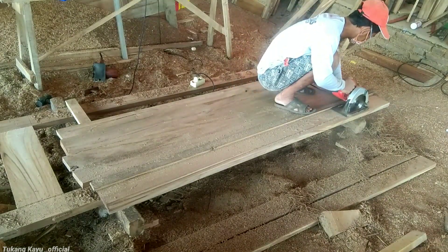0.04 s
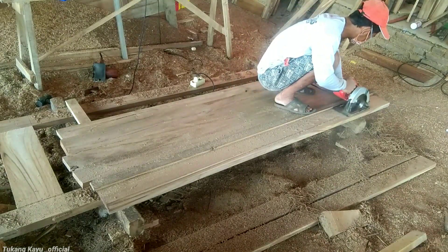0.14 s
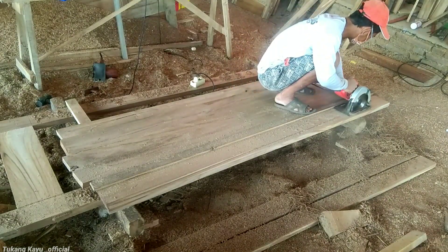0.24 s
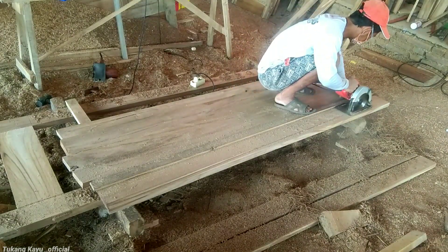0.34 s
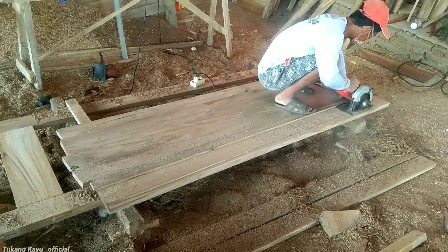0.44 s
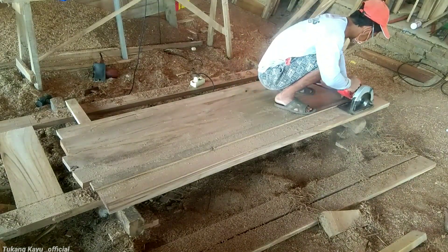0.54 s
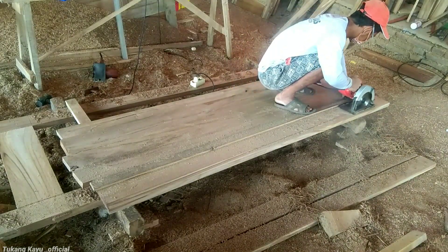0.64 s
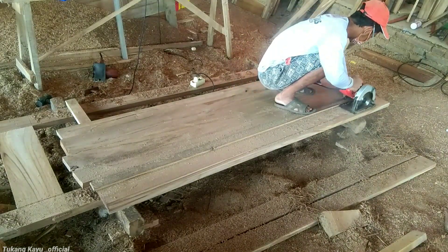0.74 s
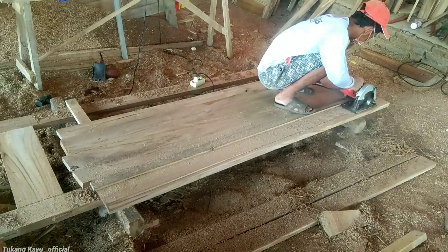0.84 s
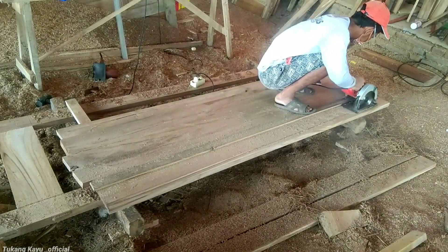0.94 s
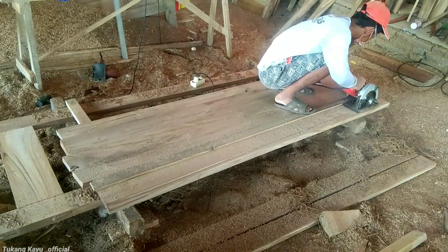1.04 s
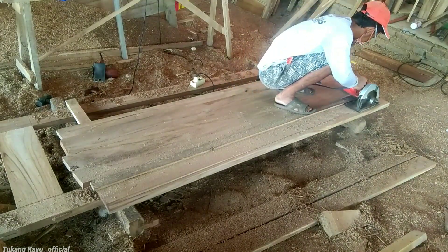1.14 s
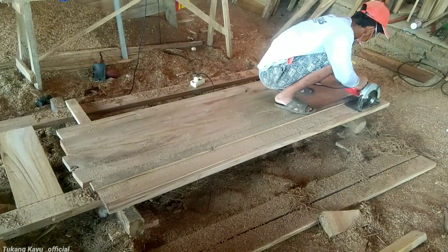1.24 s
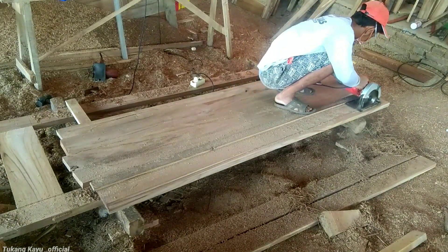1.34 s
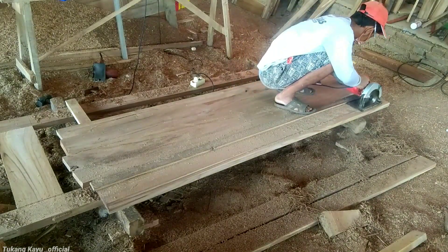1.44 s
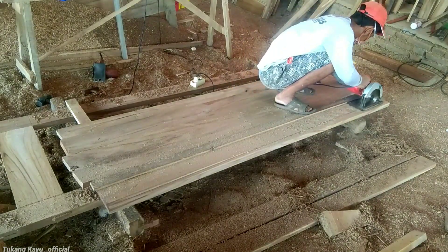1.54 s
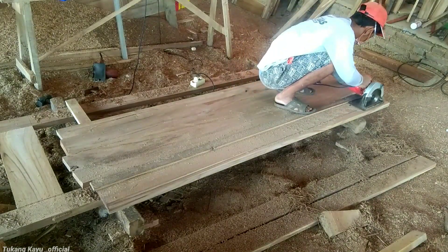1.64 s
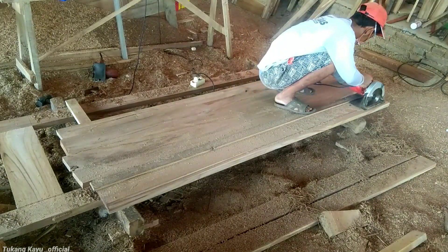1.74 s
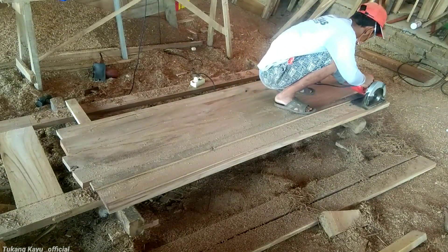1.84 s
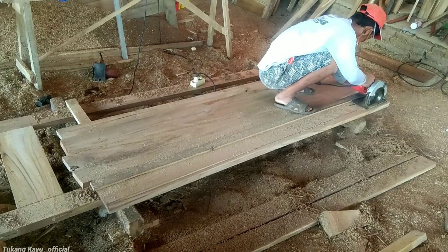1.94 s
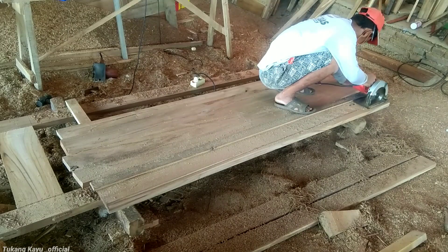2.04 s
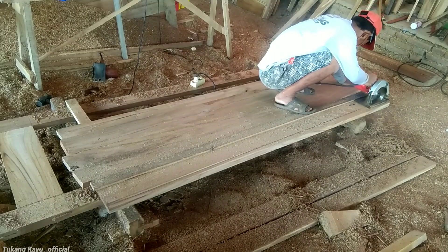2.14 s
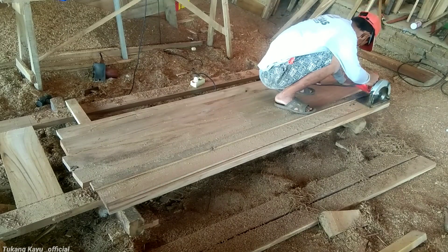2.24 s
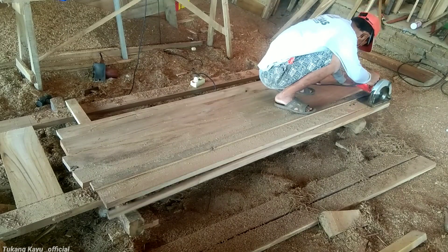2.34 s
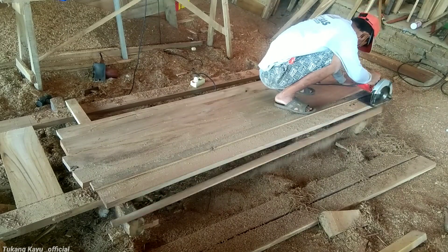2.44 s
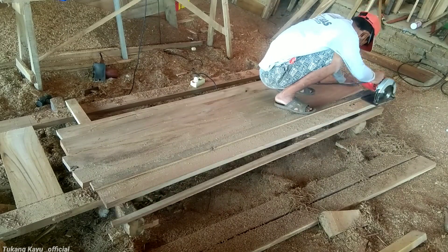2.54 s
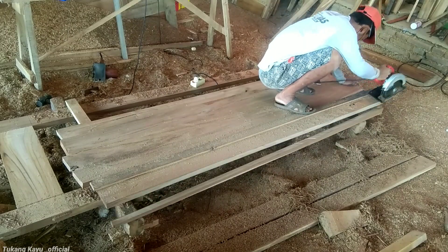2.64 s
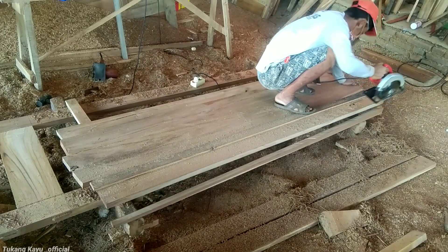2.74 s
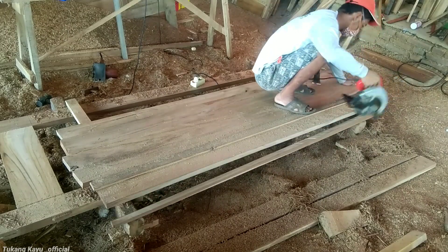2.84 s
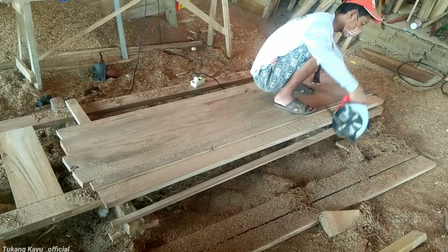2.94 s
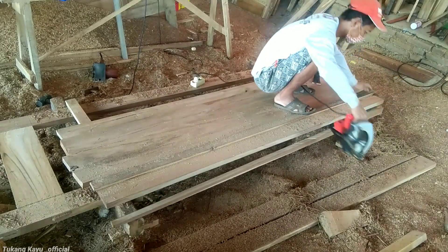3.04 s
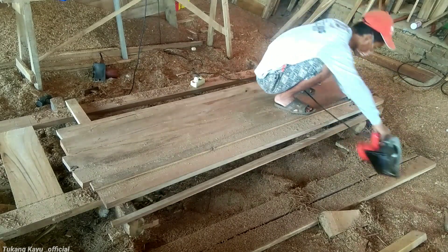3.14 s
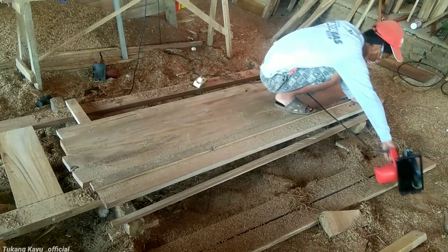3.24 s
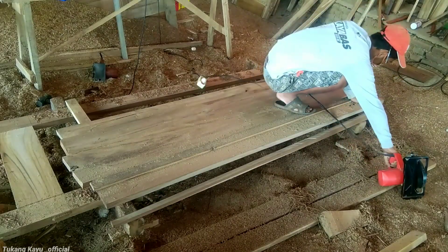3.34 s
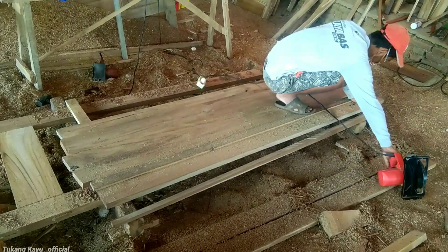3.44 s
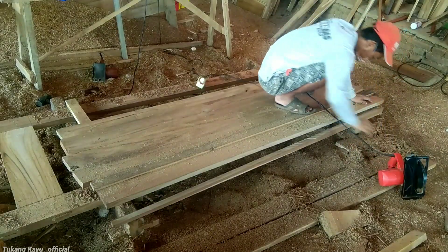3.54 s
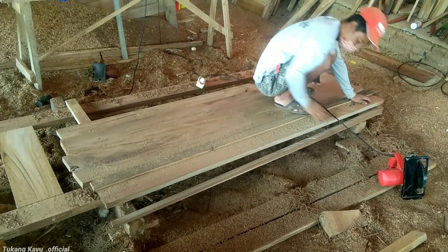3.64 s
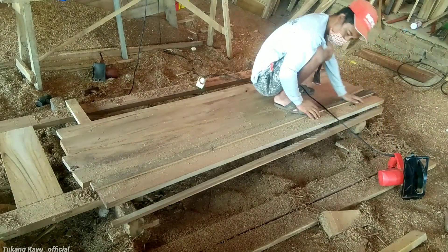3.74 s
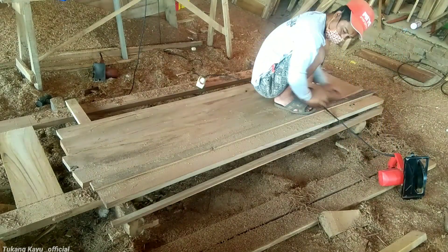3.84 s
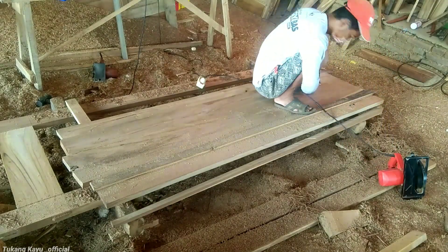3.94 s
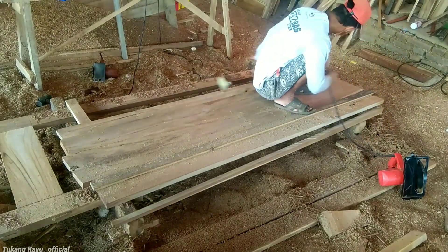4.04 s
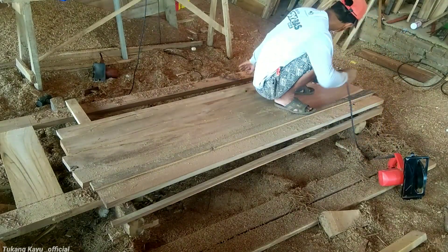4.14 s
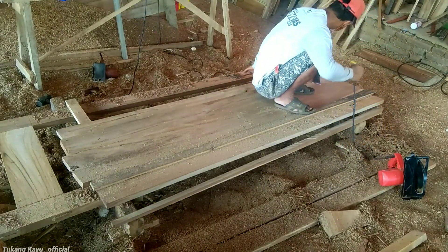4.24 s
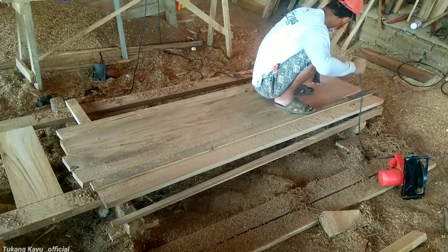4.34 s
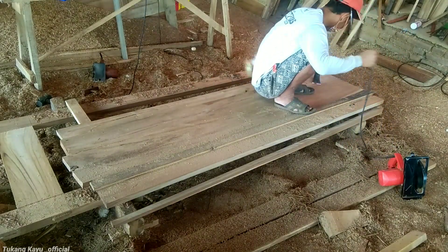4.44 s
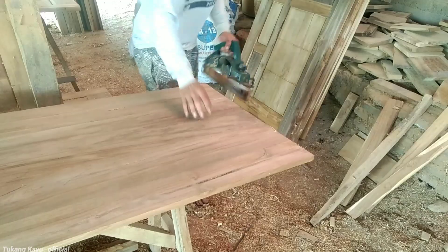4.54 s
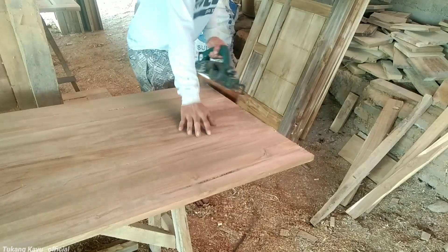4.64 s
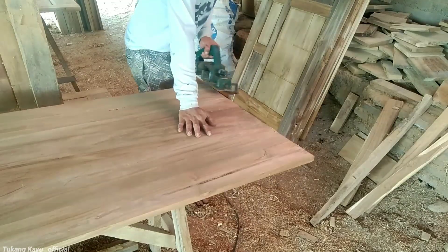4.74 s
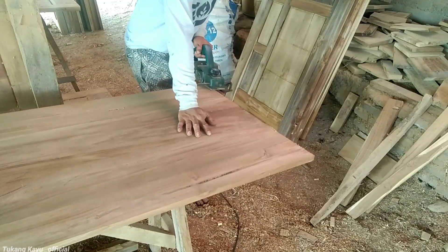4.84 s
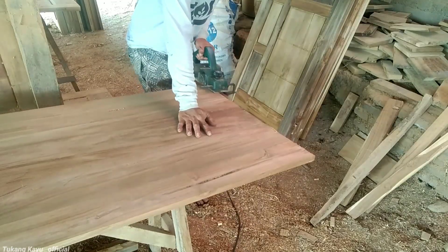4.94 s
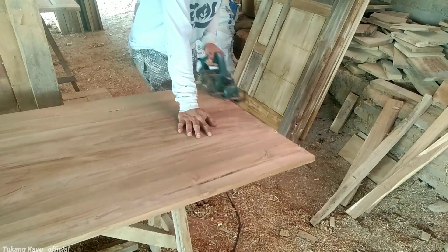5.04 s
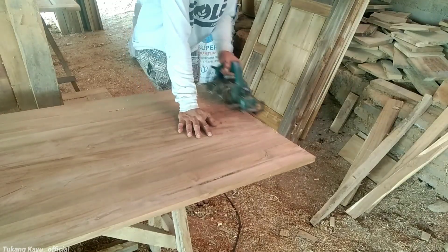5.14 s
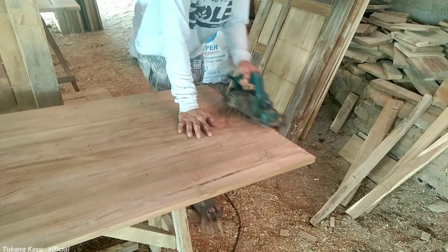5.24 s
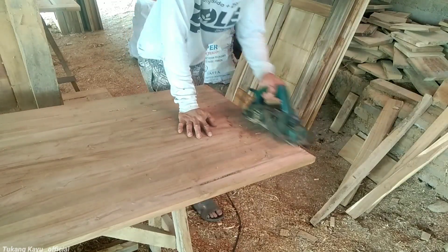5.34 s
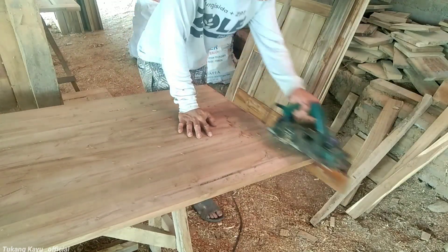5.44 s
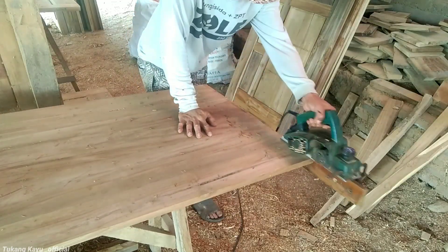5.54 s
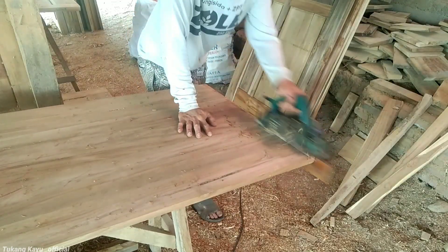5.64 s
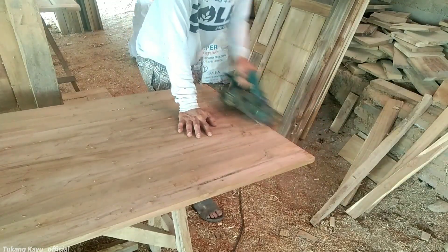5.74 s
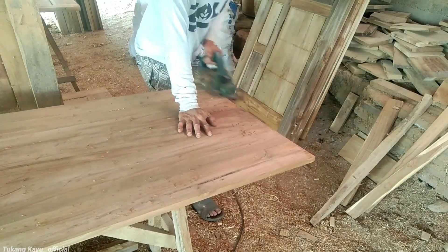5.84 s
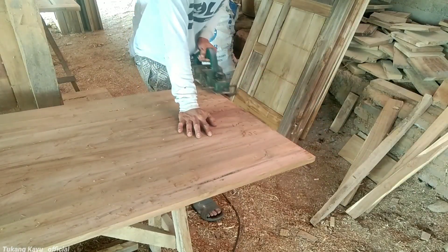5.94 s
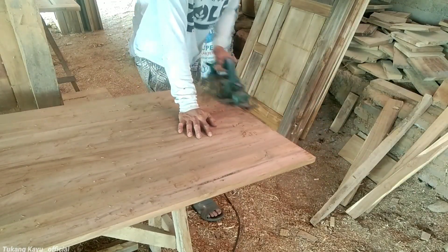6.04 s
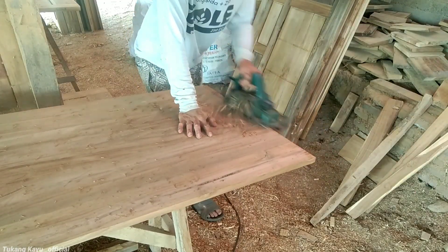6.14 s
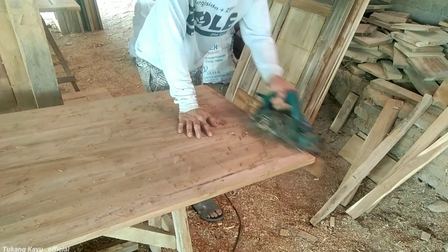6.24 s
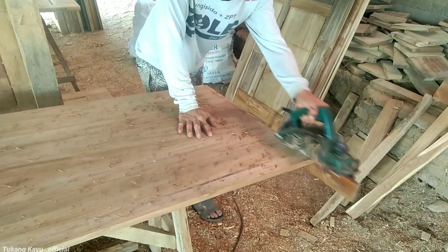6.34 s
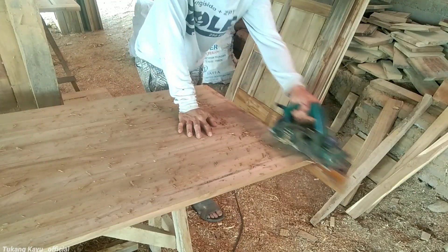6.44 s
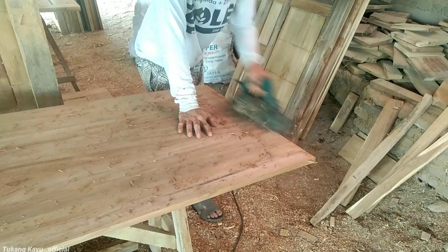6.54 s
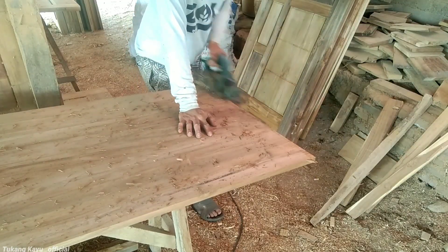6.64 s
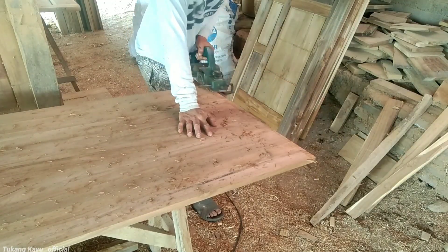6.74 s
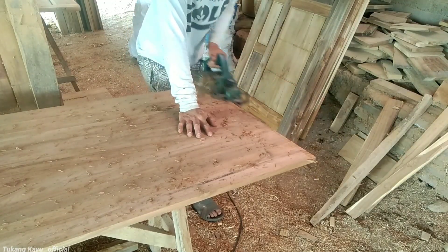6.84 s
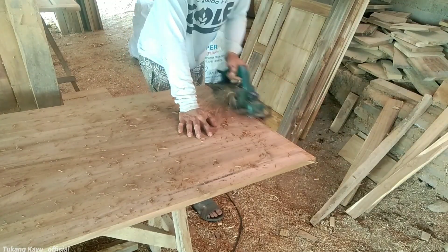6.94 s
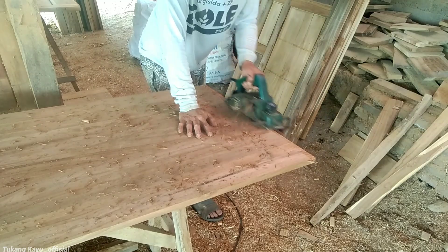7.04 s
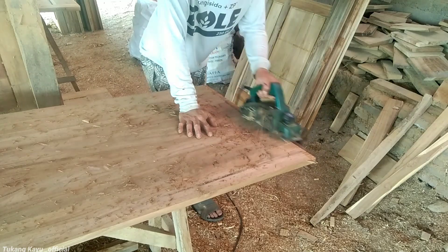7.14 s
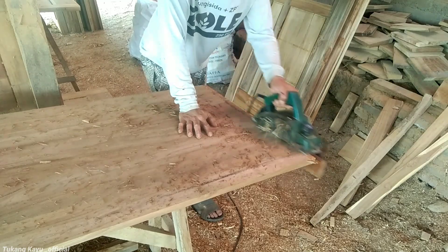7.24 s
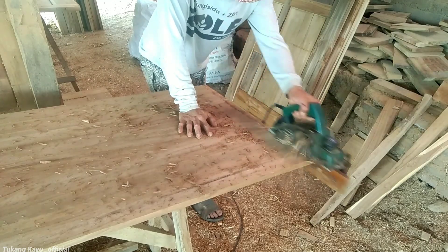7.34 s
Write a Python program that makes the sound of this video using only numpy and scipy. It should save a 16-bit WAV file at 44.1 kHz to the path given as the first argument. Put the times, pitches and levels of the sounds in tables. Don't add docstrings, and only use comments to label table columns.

```python
import sys
import numpy as np
from scipy import signal
from scipy.fft import rfft, irfft
from scipy.io import wavfile
from scipy.ndimage import uniform_filter1d

SR = 44100
rng = np.random.default_rng(int(sys.argv[2]) if len(sys.argv) > 2 else 0)


def linear_from_db(decibels):
    return 10 ** (np.asarray(decibels, float) / 20)


def wav_out(sig):
    wavfile.write(sys.argv[1], SR, np.round(np.clip(np.atleast_2d(sig).T, -1, 1) * 32767).astype(np.int16))


N = 326340
T = np.arange(N) / SR
LAND_S = 6.868
FREE_FROM_S = 5.0


def curves(table, fade=0.004):
    s, *columns = np.transpose(table)
    gate = np.interp(T, [s[0] - fade, s[0], s[-1], s[-1] + fade], [0, 1, 1, 0])
    return [np.interp(T, s, c) for c in columns] + [gate]


def hold(start, length, edge):
    return np.clip(np.minimum(T - start + edge, start + length + edge - T) / edge, 0, 1)


def ramp(start, length):
    return np.clip((T - start) / length, 0, 1)


def unit(x):
    return x / np.sqrt(np.mean(x ** 2))


def at(points, hz):
    f, db = np.transpose(points)
    return np.interp(np.log(hz + 1), np.log(f), db, left=-90, right=-90)


def walk(rate):
    k = int(SR / rate)
    steps = np.repeat(rng.standard_normal(N // k + 1), k)
    return 2.43 * uniform_filter1d(uniform_filter1d(steps, k), k)[:N]


def jumps(rate, soft):
    which = np.cumsum(rng.random(N) < rate / SR)
    return uniform_filter1d(rng.standard_normal(N // 100)[which], int(soft * SR))


def hiss(points, patchy_db, rate):
    hz = np.arange(N // 2 + 1) * SR / N
    spec = rfft(rng.standard_normal(N)) * linear_from_db(at(points, hz))
    place = 2 * np.log2(hz + 1)
    first, last = int(2 * np.log2(points[0][0])), int(2 * np.log2(points[-1][0])) + 1
    total = np.zeros(N)
    for b in range(first, last + 1):
        band = irfft(spec * np.clip(1 - abs(place - b), 0, 1), N)
        total += band * linear_from_db(patchy_db * walk(rate))
    return unit(total)


def ring(x, hz, width):
    return signal.lfilter(*signal.iirpeak(hz, hz / width, SR), x)


def tone(turns, hz, order, db, wobble=0.):
    audible = order * hz < 16500
    return np.sqrt(2) * linear_from_db(db) * audible * np.sin(2 * np.pi * order * turns + wobble)


def song(order):
    # start_s, length_s, loudest blade order, level_db
    songs = [(0.02, 0.34, 24, -50), (0.64, 0.15, 24.2, -48), (0.83, 0.1, 23.5, -38.5),
             (1.025, 0.3, 23.5, -40), (1.474, 0.09, 23.8, -48), (1.562, 0.11, 24, -39),
             (1.75, 0.087, 24.5, -36), (1.85, .04, 23.4, -41), (1.91, 0.045, 24.5, -39),
             (1.963, 0.031, 23.6, -46), (2.07, 0.042, 23, -46.5), (2.132, 0.12, 24, -37)]
    total = linear_from_db(-54)
    for s, d, k, db in songs:
        total = total + hold(s, d, edge=.025) * linear_from_db(db - 9 * (order - k) ** 2)
    return 20 * np.log10(total)


def howls(turns, hz):
    # start_s, length_s, first_hz, last_hz, level_db
    kerf = [
        (1.4, .35, 7850, 8050, -43),
        (2.255, .085, 6950, 6750, -39),
        (2.435, .045, 9900, 11500, -43),
    ]
    path = []
    for s, d, first_hz, last_hz, _ in kerf:
        path += [(s, first_hz), (s + d, last_hz)]
    centre_hz = np.interp(T, *np.transpose(path))
    howling = sum(hold(s, d, edge=.03) * linear_from_db(db) for s, d, _, _, db in kerf)
    howl = 0
    for k in range(36, 72):
        off_db = -6 * ((k * hz - centre_hz) / 180) ** 2
        howl = howl + tone(turns, hz, k, off_db, 0.77 * walk(40))
    return howling * howl


def saw():
    # time_s, turns_hz
    saw_speed = [(0.1, 173.8), (.72, 176.5), (.92, 173.5), (1.18, 175.3), (1.38, 174.5), (1.44, 178.5),
                 (1.53, 180.4), (1.59, 178.8), (1.72, 178.5), (1.74, 174.5), (1.77, 172.8), (1.82, 173.8),
                 (1.88, 171.8), (1.91, 173.3), (2.03, 169.5), (2.12, 168.3), (2.25, 161.5), (2.64, 172.4)]
    # time_s, level_db
    cutting = [
        (0.0, -27.5),
        (0.03, -27.5),
        (1.32, -28),
        (1.49, -31.5),
        (1.58, -28),
        (2.22, -27),
        (2.61, -30.5),
        (2.67, -41),
    ]
    # pitch_hz, density_db (per Hz)
    chip_colour = [(530, -48), (900, -25.5), (1790, -12), (3400, -11.5), (4150, -0.5), (4700, -9),
                   (6300, -10.5), (8500, -2.5), (10400, -4), (13000, -1.5), (16000, -0.5)]
    # pitch_hz, level_db
    damped_modes = [(3780, -10), (4790, -14), (5100, -8), (5570, -9), (6600, -11), (7400, -7), (8750, -1),
                    (10250, 3), (10520, 4), (11480, -4), (11950, -1), (12600, -8), (13600, -2), (14850, -3)]
    hz, _ = curves(saw_speed)
    hiss_db, gate = curves(cutting)
    turns = np.cumsum(hz) / SR
    runout = 1 + 0.034 * np.cos(2 * np.pi * turns)
    through = 0.89 * ramp(2.28, 0.073)
    chips = runout * hiss(chip_colour, patchy_db=.8, rate=20)
    chips = chips - through * ring(chips, 3460, 710)
    modes = 0
    for f, db in damped_modes:
        modes = modes + linear_from_db(db + 1.4 * walk(12)) * unit(ring(rng.standard_normal(N), f, f / 160))
    teeth = 0
    for k in range(22, 26):
        teeth = teeth + tone(turns, hz, k, song(k) + 1.4 * walk(25), .35 * walk(40))
    teeth = (1 - through) * teeth
    torn = hiss([(2000, -18), (3200, 3.0), (5600, 4.0), (6500, -1), (8000, -20)], patchy_db=1.5, rate=30)
    rasp = hold(2.43, 0.064, edge=0.037) * linear_from_db(-34) * torn
    chirp = hold(2.59, 0.017, edge=0.0065) * tone(T, 1, 4800, -33.5)
    cut = linear_from_db(hiss_db) * linear_from_db(-3) * (chips + runout * unit(modes))
    return rasp + chirp + gate * (cut + teeth) + howls(turns, hz)


def yard():
    # time_s, drone_hz, drone_db, second_db
    engine_drone = [
        (2.88, 170, -74, -89),
        (3.07, 157.7, -66, -73),
        (3.218, 173, -61, -75),
        (4.172, 162.2, -65.5, -71),
        (4.55, 177, -72, -82),
    ]
    # start_s, end_s, pitch_hz, level_db
    engine_throbs = [
        (0.12, 0.456, 428, -62),
        (2.829, 2.981, 204, -64),
        (3.688, 3.919, 211, -55),
        (4.042, 4.24, 205, -55.5),
    ]
    # time_s, level_db
    low_air = [(0.0, -57.5), (0.15, -55), (0.6, -59), (1.16, -63), (1.35, -58), (1.45, -80.5), (2.47, -57),
               (2.89, -103), (3.14, -69.5), (4.01, -86), (4.42, -99), (4.7, -86)]
    # pitch_hz, density_db (per Hz)
    low_colour = [(24, -50), (40, -37), (161, -14), (301, -11), (413, -5.5), (604, -7.5), (830, -3),
                  (1230, -7.5), (1500, -14), (1950, -48), (3300, -120)]
    hz, drone_db, second_db, gate = curves(engine_drone, fade=0.042)
    turns = np.cumsum(hz) / SR
    engine = tone(turns, hz, 1.0, drone_db + 2 * walk(23.08), 0.69 * walk(18))
    engine = engine + tone(turns, hz, 1.6, second_db, 1.0 * walk(2.2))
    rumble = linear_from_db(-63.5) * hiss([(40, -16), (120, -3), (350, 2), (600, -21)], patchy_db=1.5, rate=8)
    throbs = 0
    for a, b, f, db in engine_throbs:
        heard = np.interp(T, [a, a + 0.035, b - .04, b], [0, 1, 1, 0])
        throbs = throbs + heard * tone(T, 1, f, db + walk(30))
    lows_db, open_ = curves(low_air)
    lows = open_ * linear_from_db(lows_db) * hiss(low_colour, patchy_db=2.4, rate=12)
    return gate * (engine + rumble) + throbs + lows


def knocks():
    # start_s, peak_db, pitch_hz, crack_db, decay_s
    blows = [(0.101, -43, 428, -13, 0.17), (0.685, -19, 1350, -7.5, 0.2), (0.955, -20.5, 1560, -7.5, 0.3),
             (1.187, -23, 1100, -10, 0.24), (1.375, -58, 400, -35, .15), (1.539, -37.5, 600, -29, 0.2),
             (1.766, -49, 650, -30, 0.17), (1.875, -55, 400, -34, 0.11), (2.018, -20, 1080, -8, 0.23),
             (2.249, -55, 400, -42, .12), (2.371, -23, 2020, -9, 0.24), (2.412, -39, 374, -3, 0.84),
             (2.569, -23, 807, -12, 0.24), (2.9872, -17.5, 675, -38, 0.2), (3.063, -23.5, 466, -32, 0.16),
             (3.081, -15, 990, -28, 0.1), (3.1, -23.5, 393, -28, 0.19), (3.358, -25, 466, -17, 0.34),
             (3.852, -36, 510, -23, 0.43), (3.937, -35, 1010, -11.5, 0.97), (4.013, -24.5, 2100, -4, 0.26),
             (4.128, -44, 1340, -6.5, 0.25), (4.176, -50, 2330, -9, 0.23), (4.193, -44, 1800, -4, 0.23),
             (4.407, -50, 404, -40, 0.07), (4.507, -64.5, 308, 1.5, 0.21), (4.515, -45, 936, -20, 0.088)]
    # pitch_hz, width_hz, level_db
    wood_modes = [(391.6, 4.3, 17), (501, 94, 14.5), (660, 140, 7.5), (785, 120, 7), (994, 140, 9),
                  (1350, 410, 1), (1720, 220, -14.5), (2100, 370, -5.5), (3000, 390, 2)]
    # pitch_hz, density_db (per Hz)
    crack_colour = [(880, -37), (1500, -11), (3960, -1.5), (5830, -8), (6430, -3), (8490, -3.5), (14900, 1),
                    (16000, -5)]
    rattle_s = 0.0043
    out, t = np.zeros(N + SR), T[:SR // 2]
    hz = np.arange(len(t) // 2 + 1) * 2.
    for s, db, pitch_hz, crack_db, t60 in blows:
        fall = linear_from_db(-60 * np.maximum(t - rattle_s, 0) / max(t60, .02)) * np.minimum(t / 0.00015, 1)
        blow = fall * np.minimum(t / 0.00089, 1) * rng.standard_normal(len(t))
        blow[:20] -= 1.82 * np.hanning(20)
        wood = 0
        for f, w, g in wood_modes:
            octaves = np.log2(f / pitch_hz)
            tilt_db = g - 4.8 * abs(octaves) - 2.5 * max(octaves, 0)
            dry_out = linear_from_db(-69.5 * t * f / 1000)
            wood = wood + linear_from_db(tilt_db) * ring(blow * dry_out, f, w)
        colour = linear_from_db(at(crack_colour, hz) + 2.0 * crack_db * np.log2(1 + hz / 3000))
        snap = unit(irfft(rfft(rng.standard_normal(len(t))) * colour))
        crack = linear_from_db(-130 * t / max(t60, .02)) * snap
        chop_db = -300 * np.maximum(t - .04, 0)
        out[int(s * SR):][:len(t)] += linear_from_db(db + chop_db) * (wood / abs(wood).max() + linear_from_db(crack_db) * crack)
    steep = signal.sosfilt(signal.butter(8, 350, "high", fs=SR, output="sos"), out[:N])
    return steep + linear_from_db(-11.0) * out[:N]


def coast():
    # time_s, mesh_hz
    gear_mesh = [
        (2.62, 13804),
        (2.72, 12697),
        (3.02, 9821),
        (3.42, 6172),
        (3.72, 3586),
        (3.82, 2815),
        (4.02, 1444),
    ]
    # multiple of the mesh, level_db
    gear_orders = [(1, 2), (1.33, -13), (1.5, -4), (1.75, -13), (2, -4), (2.5, -10), (3, -5), (3.5, -7),
                   (4, -5), (4.5, -9), (5, -6), (6, -7), (7, -9), (8, -9), (9, -10)]
    # pitch_hz, density_db (per Hz)
    wind_colour = [(530, -70.5), (900, -33), (1720, -9), (3110, -10.5), (3300, -7.5), (3960, -1),
                   (4630, -10), (9880, -9), (13400, -10.5), (16000, -16)]
    # pitch_hz, level_db
    free_modes = [(3320, -54), (6050, -48.5), (4522, -49.5), (4850, -49), (5750, -64), (6347, -57),
                  (6970, -39.5), (7381, -44.5), (7780, -36), (8414, -33), (9800, -35), (3750, -45),
                  (10510, -35), (11073, -55)]
    off_s, lifted_s, laid_s, thin_s = 2.6, 2.924, 4.04, 3.4
    mesh_per_turn = 80
    case_hz, overtone_hz = 3700, 9000

    def guard_db(f):
        return 8 * np.exp(-(np.log2(f / 4320) / 0.25) ** 2)

    hz, turning = curves(gear_mesh, fade=0.03)
    turns = np.cumsum(hz) / SR
    blade_hz, blade_turns = hz / mesh_per_turn, turns / mesh_per_turn
    gate = hold(off_s, laid_s - off_s, edge=0.19) ** 2 * (T > off_s - .04)
    shade_db = -13 * np.clip((lifted_s - T) / 0.28, 0, 1)
    whine_db = -48.5 + shade_db - 60 * np.clip(T - 3.7, 0, .35)
    thinned = ramp(thin_s - .1, .1)
    whine = 0
    for k, db in gear_orders:
        order_db = whine_db + db + guard_db(k * hz) + 2.2 * walk(60)
        if k > 1:
            order_db = order_db + walk(12) + 9 * np.minimum(np.log2(k * hz / overtone_hz), 0)
        whine = whine + tone(turns, hz, k, order_db, .5 * np.sqrt(k) * walk(250))
    for k in rng.choice(np.arange(24, 64), size=22, replace=False):
        order_db = whine_db - 17.5 + guard_db(k * blade_hz) + 3.2 * walk(16) - 6 * thinned
        order_db = order_db + 40 * np.minimum(np.log2(k * blade_hz / case_hz), 0)
        whine = whine + tone(blade_turns, blade_hz, k, order_db, .4 * walk(250))
    wind_db = -39 + 1.5 * np.log2(hz / 10000) + shade_db
    wind = hiss(wind_colour, patchy_db=1.1, rate=14)
    upper = signal.sosfilt(signal.butter(4, 2920, "high", fs=SR, output="sos"), wind)
    wind = wind - 0.42 * ramp(thin_s, 0.038) * (wind - upper)
    sing = hold(2.87, 0.1, edge=0.02) * tone(blade_turns, blade_hz, 29.9, -45 + 2 * walk(39.86))
    ring_db = -36 - 9.5 * (T - off_s) - 39.5 * np.maximum(T - 3.33, 0)
    blade = 0
    for f, db in free_modes:
        blade = blade + linear_from_db(db + 3.0 * walk(15)) * unit(ring(rng.standard_normal(N), f, 11.5))
    return turning * whine + sing + gate * (linear_from_db(wind_db) * wind + linear_from_db(ring_db) * unit(blade))


def ticks():
    # start_s, peak_db, pitch_hz, decay_s
    hard_ticks = [(4.165, -50, 9600, 0.055), (4.014, -30, 13400, .16), (4.344, -51, 1650, 0.16),
                  (4.345, -58.5, 4910, .1), (4.364, -34.5, 2890, 0.094), (4.365, -43.5, 1190, 0.1),
                  (4.365, -50, 4930, 0.094), (4.373, -55, 2990, 0.19), (4.39, -65, 12800, 0.09),
                  (4.39, -71, 6400, 0.13), (4.738, -16.5, 6640, 0.094), (4.749, -20.5, 5750, 0.68),
                  (7.05, -23, 5000, 0.2), (5.071, -19, 4840, 0.055)]
    out, t = np.zeros(N), T[:SR // 4]
    for s, db, hz, t60 in hard_ticks:
        noise = rng.standard_normal(len(t))
        burst = linear_from_db(-60 * t / t60) * ring(ring(noise, hz, hz / 6), hz, hz / 6)
        out[int(s * SR):][:len(t)] += linear_from_db(db) * burst / abs(burst).max()
    return out


def panel_drum():
    # time_s, level_db
    drum_level = [(4.58, -70), (4.65, -62), (4.75, -54), (4.9, -44), (5.05, -52), (5.1, -58), (5.85, -56.5),
                  (5.9, -63), (7.36, -64.5), (7.4, -40)]
    panel_db, drumming = curves(drum_level)
    colour = [(40, -42), (70, -8), (120, -3.0), (250, 11.0), (450, -11.0), (800, -8), (1500, -28)]
    return drumming * linear_from_db(panel_db) * hiss(colour, patchy_db=2.0, rate=16)


def fan_air(load_hz, hz, turns, biting, strain_db):
    # pitch_hz, density_db (per Hz)
    air_colour = [(350, -9.5), (600, -4.5), (812, -4.5), (1110, -1), (1370, -3), (2180, 0), (3580, -1),
                  (13600, 2.5), (16000, -0.5)]
    # time_s, level_db
    waking_air = [
        (4.575, -80),
        (4.62, -82.5),
        (4.65, -59),
        (4.69, -37),
        (4.73, -32),
        (4.742, -54),
    ]
    away_s = 5.86
    air_db = -31 - 1.5 * ramp(away_s, 0.029) - 4 * biting
    air_db = air_db + 19 * np.log2(load_hz / 540) + 4 * np.log2(np.clip(hz / 500, .3, 1))
    air = (1 + 0.35 * np.cos(2 * np.pi * turns)) * hiss(air_colour, patchy_db=1.4, rate=25)
    lows = signal.sosfilt(signal.butter(1, 1800, fs=SR, output="sos"), air)
    air = air - 0.23 * ramp(away_s, 0.045) * lows
    sparks = (T < FREE_FROM_S + .1) * unit(ring(air, 8400, 2900))
    air = air + linear_from_db(-50 + strain_db - air_db) * sparks
    wake_db, waking = curves(waking_air)
    spinning = ramp(4.737, .004)
    return spinning * linear_from_db(air_db + 3.0) * air + waking * linear_from_db(wake_db) * air


def belt_squeal():
    # time_s, level_db
    belt_slip = [
        (4.655, -36),
        (4.664, -21),
        (4.672, -40),
        (4.68, -24),
        (4.699, -22),
        (4.707, -33),
        (4.74, -39),
    ]
    squeal_db, slipping = curves(belt_slip, fade=.001)
    level = linear_from_db(squeal_db - 1 + 1.2 * walk(370))
    shriek = hiss([(12000, -22), (13500, 7), (15000, 16), (16000, -15)], patchy_db=.6, rate=61)
    return slipping * level * shriek


def planer_motor(turns, hz, strain_db):
    motor_orders = [(.63, -70), (1.74, -52), (8, -58), (10, -57), (13, -60), (15, -56), (17, -51),
                    (19, -53), (21.5, -52), (23, -53), (39, -51)]
    motor = 0
    for k, db in motor_orders:
        order_db = db - 10 * (T > LAND_S) + 2 * walk(25)
        if k > 5:
            order_db = order_db + strain_db
        if k > 30:
            order_db = order_db - 25 * (hz > 290)
        if k < 30:
            order_db = order_db - 12 * (hz < 270)
        motor = motor + tone(turns, hz, k, order_db, k / 22 * walk(250))
    return ramp(4.68, 0.0096) * motor


def swell(order, rest_db):
    standing_waves = {1: [(4.92, 0.1, -46), (5.09, 0.18, -46), (5.33, 0.23, -38), (5.66, 0.038, -43),
                      (5.745, 0.13, -37), (6.22, 0.16, -43), (6.51, 0.157, -49), (6.75, 0.16, -61),
                      (7.15, 0.24, -48)], 2: [(4.72, 0.063, -43), (4.84, .1, -45), (4.94, .11, -41),
                      (5.15, 0.087, -37.5), (5.23, 0.36, -38), (5.6, 0.095, -38), (5.8, 0.079, -43),
                      (5.92, 0.245, -42), (6.35, 0.54, -44), (7.05, 0.13, -52), (7.17, 0.21, -49)],
                      4: [(4.8, 0.075, -46), (4.88, 0.15, -31), (5.09, 0.15, -34.5), (5.24, 0.18, -40.5),
                      (5.38, 0.16, -32.5), (5.57, 0.12, -38), (5.74, 0.14, -34), (5.97, 0.27, -41),
                      (6.3, 0.25, -40.5), (6.5, 0.097, -33.5), (6.6, 0.31, -39.5), (6.9, 0.1, -43),
                      (7.18, 0.063, -50), (7.32, .1, -42)], 6: [(4.755, .015, -33), (4.79, 0.257, -33.5),
                      (5.07, 0.069, -39), (5.22, .14, -40), (5.4, 0.053, -36), (5.51, 0.073, -44),
                      (5.64, 0.1, -42.5), (5.82, 0.043, -42.5), (5.93, 0.17, -40), (6.2, 0.08, -49),
                      (6.35, 0.1, -36.5), (6.54, 0.16, -40.5), (6.75, 0.05, -47), (6.87, 0.21, -38),
                      (7.1, 0.25, -42.5)]}
    levels = [linear_from_db(rest_db) + hold(s, d, edge=.02) * linear_from_db(db) for s, d, db in standing_waves[order]]
    return 20 * np.log10(np.max(levels, axis=0))


def siren(turns, hz):
    # multiple of the knife rate, level_db
    siren_rest = [(1, -54.5), (2, -54), (4, -48.5), (6, -47)]
    tones = sum(tone(turns, hz, k, swell(k, db) + 1.5 * walk(60)) for k, db in siren_rest)
    return ramp(4.7, 0.1) * tones


def bites():
    # start_s, length_s, even_db, odd_below_even_db (small when one knife bites deeper)
    knife_bites = [(5.043, 0.31, -41, -2.5), (5.375, .165, -43.5, -15), (5.552, 0.028, -41, -2),
                   (5.593, 0.091, -40.5, -13), (5.692, 0.033, -39.5, -5), (5.739, 0.13, -39.5, -12),
                   (5.871, 0.11, -39, -6), (5.997, .27, -39, -3.5), (6.305, .03, -44, -11),
                   (6.347, .036, -48, -11), (6.394, 0.061, -41.5, -2), (6.49, .042, -48, -10),
                   (6.545, 0.031, -40, -5), (6.591, 0.18, -40, -6.5), (6.87, 0.29, -40.5, -0.5),
                   (7.16, .32, -41.5, -2.5)]
    even = linear_from_db(-54.5) * np.clip((T - FREE_FROM_S) / 0.042, .4, 1)
    odd, depth = linear_from_db(-56), 0
    for s, d, db, odd_db in knife_bites:
        biting = hold(s, d, edge=0.01)
        even = even + biting * linear_from_db(db)
        odd = odd + biting * linear_from_db(db + odd_db)
        depth = depth + biting * linear_from_db(odd_db / 2)
    return np.minimum(depth, 1), 20 * np.log10(even), 20 * np.log10(odd)


def knife_strikes(turns, hz, even_db, odd_db):
    # pitch_hz, level_db
    strike_colour = [(1300, -6.5), (2500, -7), (3500, -0.5), (5500, 1), (8500, 1.5), (11500, -4),
                     (14500, -2), (16500, -4)]
    landing = 4 * np.clip(1 - (T - LAND_S) / .025, 0, 1)
    landing_db = np.where(T < LAND_S, -14 * (T > 6.8), landing)
    strikes = 0
    for k in [3, 5, *range(7, 36)]:
        order_db = (odd_db if k % 2 else even_db) + landing_db + at(strike_colour, k * hz)
        if k == 3:
            order_db = order_db - 5.5 * (T > LAND_S)
        order_db = order_db + 3 * np.clip(jumps(38, .004), -2.5, 1.3) + 1.5 * walk(100)
        strikes = strikes + tone(turns, hz, k, order_db, np.pi / 2 + .45 * walk(18))
    return ramp(4.737, .004) * strikes


def planer():
    # time_s, knife_hz
    load_speed = [(5.21, 538.5), (5.35, 529.5), (5.42, 543), (5.66, 566), (5.85, 567.3), (5.94, 549),
                  (6.04, 549.7), (6.25, 492), (6.39, 515.5), (6.46, 517.4), (6.55, 538), (6.76, 522),
                  (6.87, 539.5), (6.98, 495.7), (7.11, 459.5), (7.23, 472), (7.3, 469), (7.39, 483.6)]
    load_hz, _ = curves(load_speed)
    hz = load_hz * (1 - np.exp(-np.maximum(T - 4.625, 0) / .153))
    turns = np.cumsum(hz) / SR + .0015 * walk(100) + .02 * walk(25)
    strain_db = 12 * np.exp(-((T - 4.84) / .12) ** 2 / 2)
    biting, even_db, odd_db = bites()
    tool = planer_motor(turns, hz, strain_db) + siren(turns, hz) + knife_strikes(turns, hz, even_db, odd_db)
    return panel_drum() + fan_air(load_hz, hz, turns, biting, strain_db) + belt_squeal() + tool


def scene():
    mono = saw() + yard() + knocks() + coast() + ticks() + planer()
    return np.array([mono, mono])


def roll_off(x):
    return signal.sosfilt(signal.butter(12, 16760, fs=SR, output="sos"), x)


def record(dry):
    split_times = [1.09, 1.135, 1.25, 5.475, 5.545, 5.73, 6.405, 6.59, 6.705, 6.89, 6.935, 7.055, 7.1]
    top_hz = 15650
    side, window = np.zeros(N), np.hanning(2048)
    centres_hz = 5000 + 9800 * rng.random(2 * len(split_times)) ** .6
    for s, hz in zip([*split_times, *split_times], centres_hz):
        band = signal.butter(6, [hz - 900, min(hz + 900, top_hz)], "band", fs=SR, output="sos")
        burst = unit(signal.sosfilt(band, rng.standard_normal(2048)))
        side[int(s * SR) - 1024:][:2048] += window * burst
    wide = dry + linear_from_db(-37.5) * np.array([side, -side])
    mix = signal.sosfilt(signal.ellip(10, .2, 60, top_hz, fs=SR, output="sos"), wide)
    return roll_off(mix)


dry = scene()
out = record(dry)
wav_out(out)
```